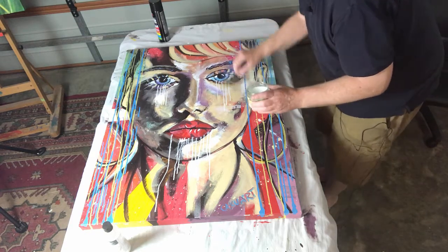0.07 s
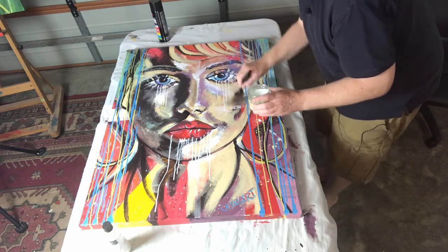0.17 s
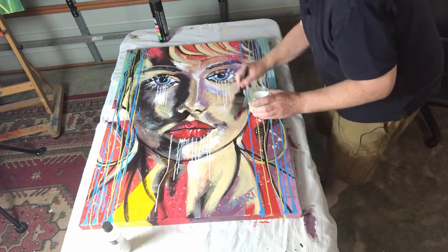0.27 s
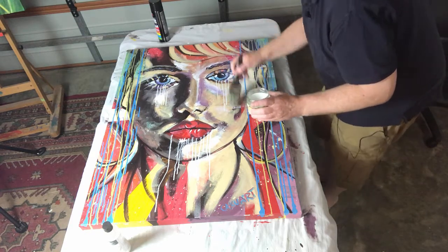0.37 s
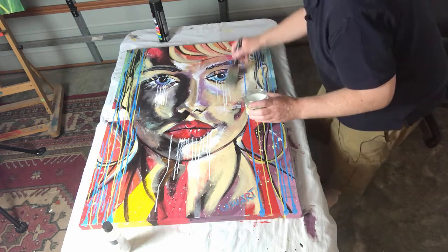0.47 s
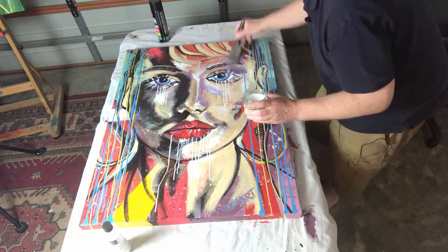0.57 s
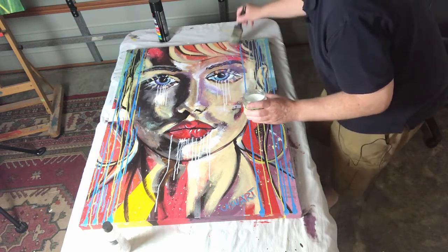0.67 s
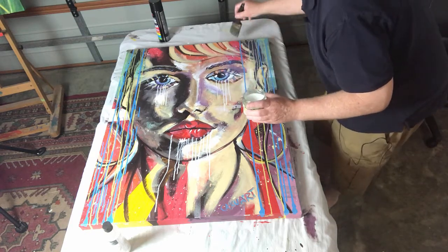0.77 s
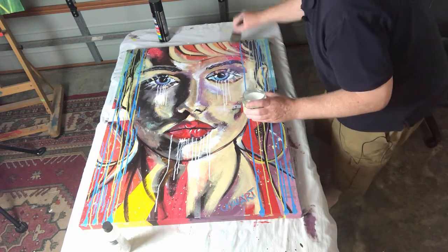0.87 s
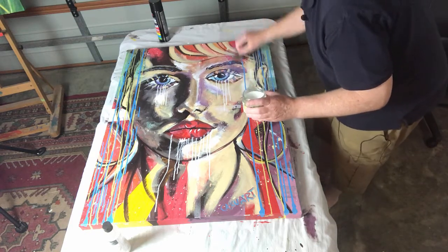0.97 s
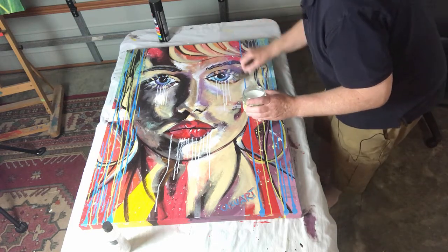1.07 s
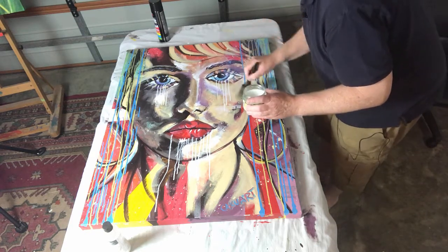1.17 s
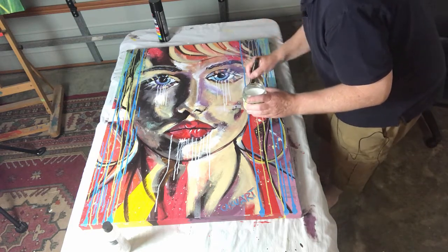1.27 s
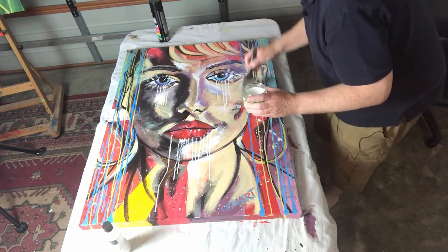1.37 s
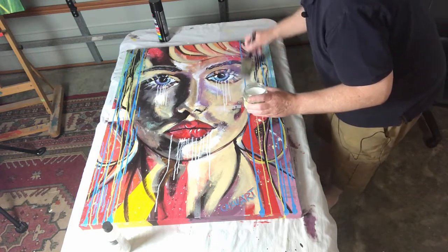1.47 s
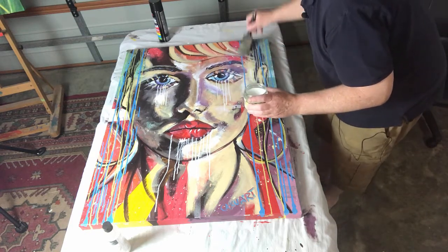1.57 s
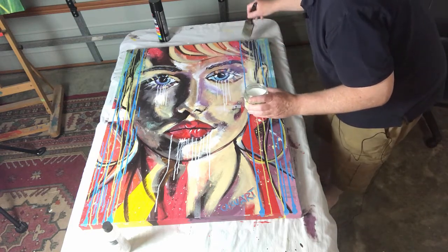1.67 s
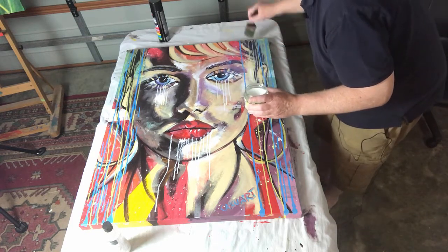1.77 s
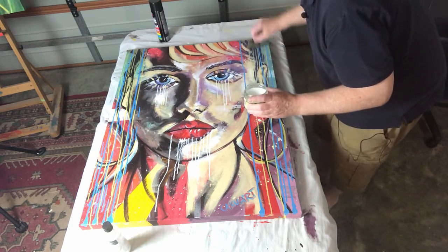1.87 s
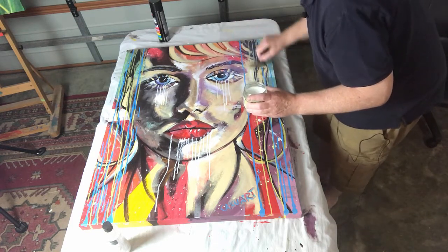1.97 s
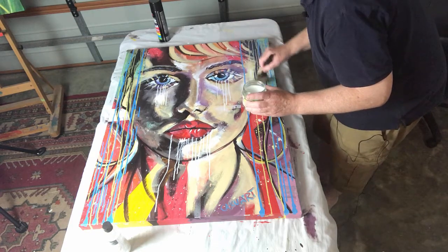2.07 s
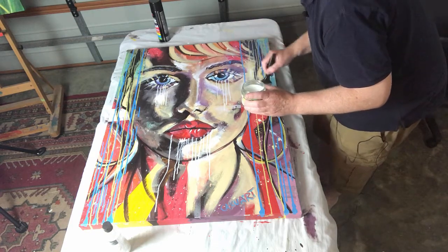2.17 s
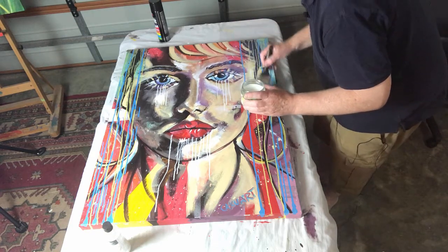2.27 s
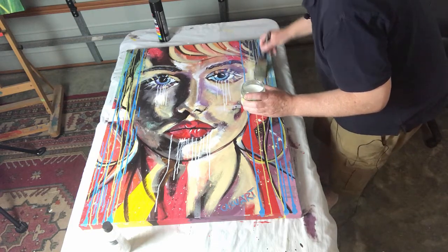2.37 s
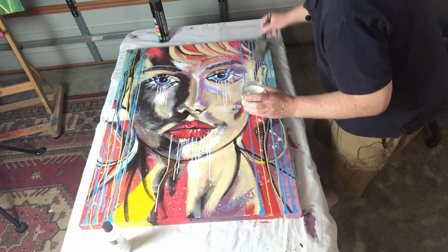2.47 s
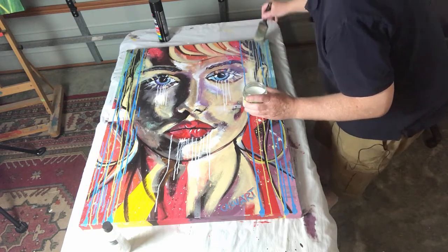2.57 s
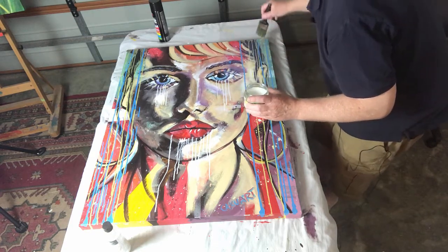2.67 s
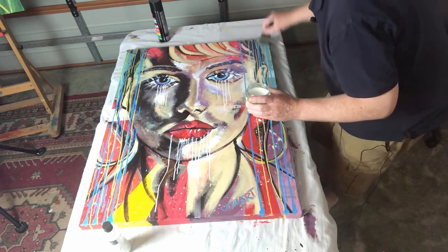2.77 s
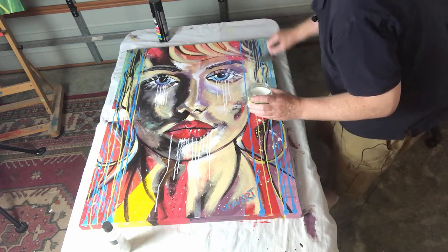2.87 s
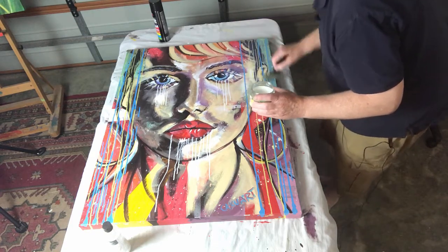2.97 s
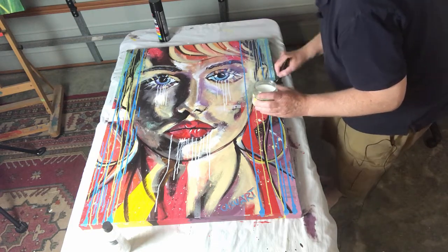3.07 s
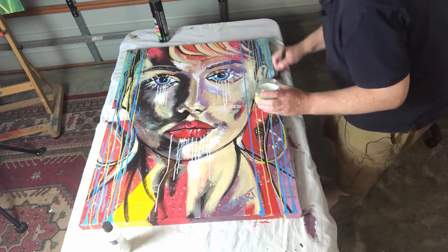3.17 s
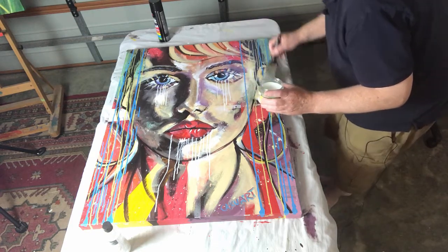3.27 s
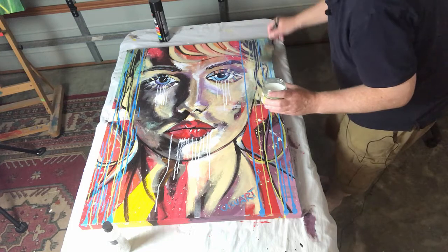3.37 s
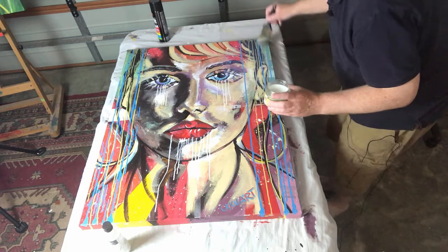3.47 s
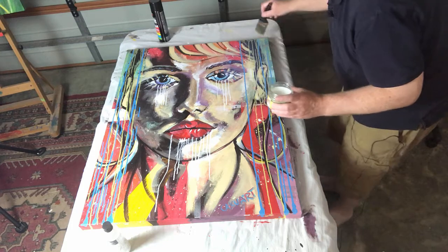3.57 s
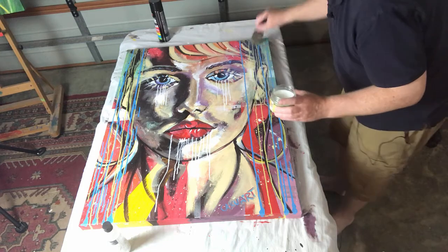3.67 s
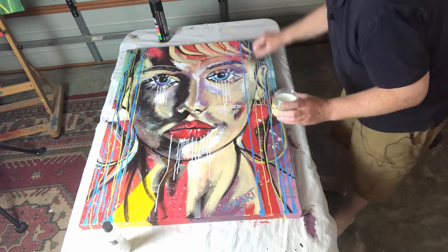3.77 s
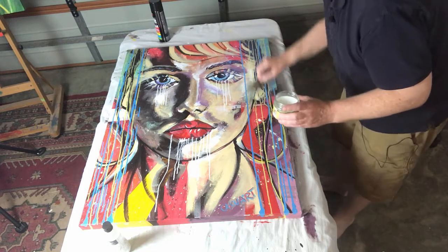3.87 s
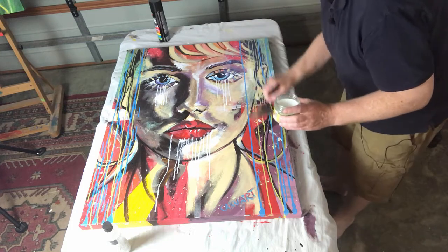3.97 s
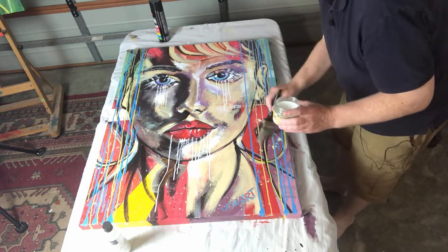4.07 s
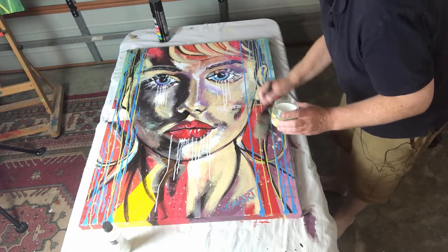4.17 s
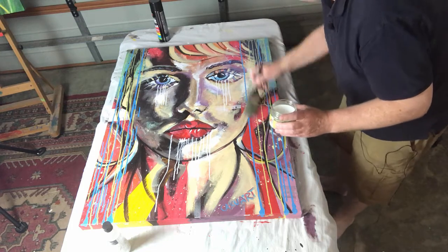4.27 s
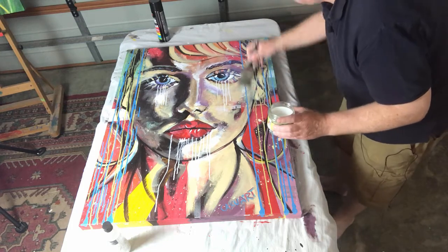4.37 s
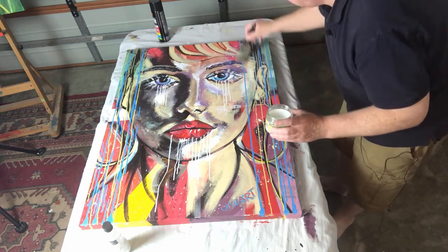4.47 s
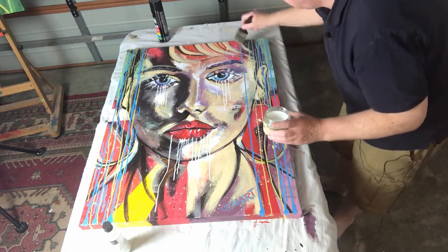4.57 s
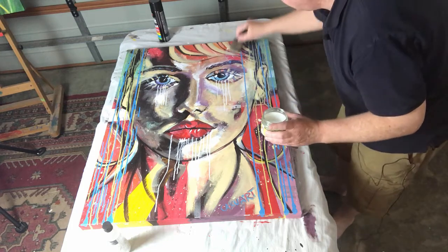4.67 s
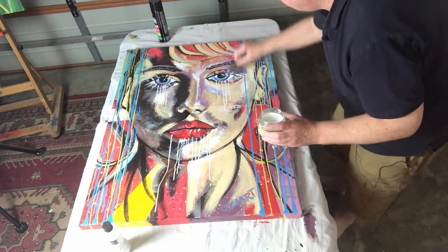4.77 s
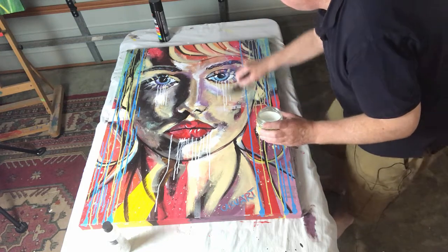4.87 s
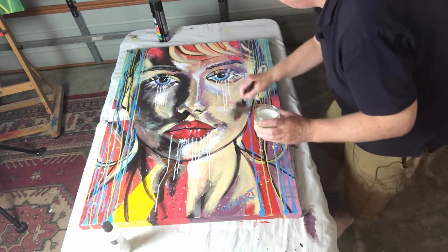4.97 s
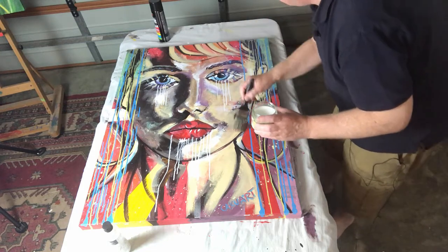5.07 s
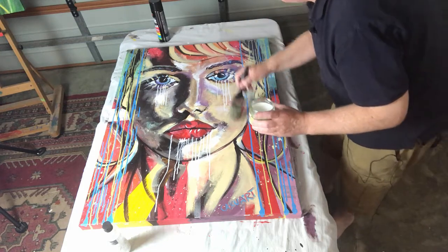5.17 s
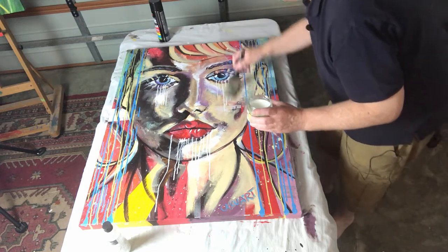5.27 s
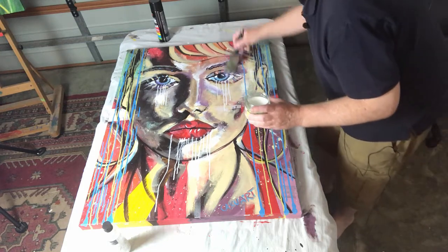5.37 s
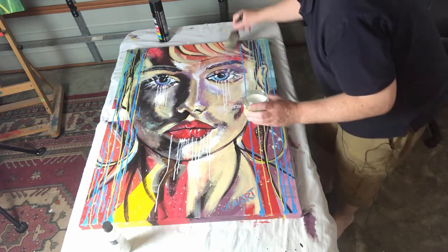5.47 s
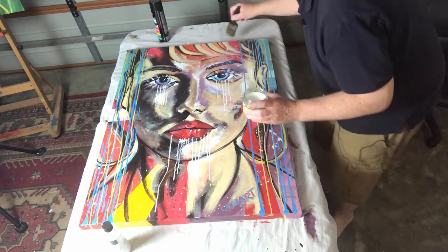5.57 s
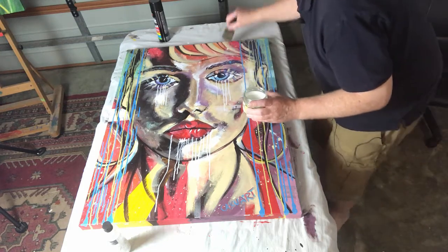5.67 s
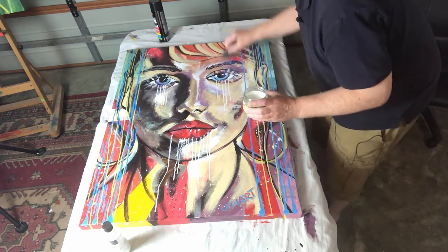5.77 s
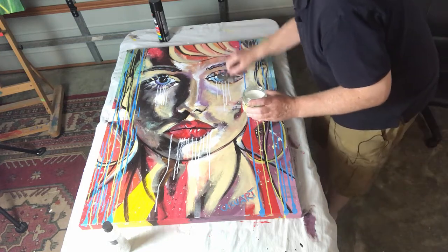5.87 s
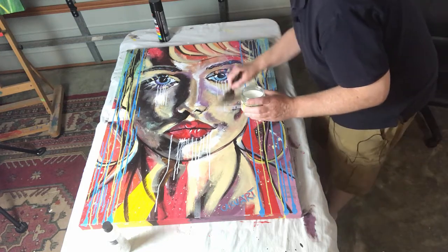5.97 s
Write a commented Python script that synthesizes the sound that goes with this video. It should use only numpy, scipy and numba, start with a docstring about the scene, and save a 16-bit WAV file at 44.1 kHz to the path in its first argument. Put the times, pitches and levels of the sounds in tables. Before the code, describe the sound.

A flat brush sweeps up and down a stretched canvas, about two strokes a second. Each stroke is a bristly hiss over a soft, hollow rub, with a light rasp that follows the speed of the hand. Now and then the bristles give a brief zip or bump the cloth, and two small ticks come midway. The room is a quiet garage with a short echo and faint hiss, heard in mono.

```python
"""A flat brush sweeps varnish up and down a stretched canvas: thirteen strokes, pulled and pushed by turns.
Its bristles flick over the threads and hiss, the cloth sounds like a soft drumhead, and a rasp
glides with the hand's speed. Now and then the brush zips, bumps or ticks.
Behind it is a quiet garage with a short echo, slow air and a faint hiss, all in mono."""
import sys
import numpy as np
from scipy import signal
from scipy.fft import rfft, irfft
from scipy.io import wavfile
from scipy.ndimage import uniform_filter1d, map_coordinates
from numba import njit

SR = 44100
rng = np.random.default_rng(int(sys.argv[2]) if len(sys.argv) > 2 else 0)


def dump(signal):
    """Clip the signal to [-1, 1] and save it as 16-bit WAV at the path in sys.argv[1]."""
    limited = np.clip(np.atleast_2d(signal).T, -1, 1)
    pcm = np.round(limited * 32767).astype(np.int16)
    wavfile.write(sys.argv[1], SR, pcm)


N = 264688
TIME = np.arange(N) / SR
COAST_S = (0.0976, .05)  # the hand runs on after easing off: pulled, pushed

# How the rub, scrape and hiss rise and fade in a stroke; first row pulled, second row pushed:
# lag/s, rise/s, growth along the stroke/dB, fade/(dB per s)
RUB_SHAPE = [(.004, 0.036, -1.3, 154), (.003, 0.032, 3.2, 197)]
SCRAPE_SHAPE = [(.004, .06, 12.5, 141), (.005, 0.038, -4.5, 124)]
HISS_SHAPE = [(0.0054, 0.061, 1.7, 206), (0.0064, 0.043, -0.75, 170)]
# The strokes, a pulled one first: start/s, easing off/s, rub/dB, scrape/dB, hiss/dB,
# threads crossed at top speed/Hz, brightness/dB, first comb spacing/Hz, last comb spacing/Hz
STROKES = [ (-.2, 0.159, -47.5, -54.5, -47.5, 2000, 1.5, 7500, 5330),
           (0.268, 0.603, -45.5, -54, -46, 1920, 3, 5140, 9400),
           (0.756, 1.107, -44.5, -52.5, -42.5, 1970, -1, 9300, 5840),
           (1.245, 1.546, -47, -51.5, -44, 1990, 1.5, 6700, 10100),
           (1.715, 2.04, -48, -51.5, -41.5, 1690, -1, 9150, 9100),
           (2.17, 2.496, -48, -54, -45.5, 1730, -2, 8900, 10900),
           (2.623, 3.008, -47, -53, -41, 1550, 1.5, 8700, 8700),
           (3.126, 3.415, -47, -51, -41.5, 1690, 2.5, 8500, 9500),
           (3.567, 3.974, -48.5, -51, -46.5, 2030, -1, 8500, 5530),
           (4.071, 4.418, -45.5, -49, -42, 1990, 4.5, 5030, 8200),
           (4.586, 4.909, -46.5, -52.6, -43, 1830, 2, 6900, 4840),
           (5.092, 5.42, -44.5, -52, -43, 1990, 4, 4800, 9400),
           (5.595, 5.939, -44.5, -52.5, -44.3, 1980, 2, 8200, 5400)]
def brush(rub_press_share=0.68, scrape_press_share=0.78, skate_db=-3):
    """Each stroke rubs, scrapes, rasps and hisses; a pulled tuft skates, a pushed one digs in."""
    rub_db, scrape_db, hiss_db = np.transpose(STROKES)[2:5]
    pulled = np.arange(len(STROKES)) % 2 == 0
    body = canvas(stroke_level(rub_db, RUB_SHAPE, rub_press_share),
                  stroke_level(scrape_db, SCRAPE_SHAPE, scrape_press_share))
    rasp = weave(stroke_level(rub_db + skate_db * pulled, RUB_SHAPE, rub_press_share))
    hiss = bristles(stroke_level(hiss_db, HISS_SHAPE))
    return body + rasp + hiss


# The tone of the rubbed cloth and of the bent bristles: f/Hz, level/dB
RUB_TONE = [(100, -21), (200, -10), (305, -7), (370, -3.5), (450, 0), (600, 3), (800, -1), (1050, -3.5),
            (1500, -13), (2400, -29), (3400, -45)]
SCRAPE_TONE = [(600, -16), (980, 2), (1300, 0.5), (1750, -2), (2150, 0), (2650, -8), (3300, -16.5),
               (4500, -12.5)]
def canvas(rub_db, scrape_db, frame_hz=240, swing_hz=170, patchy_db=0.78):
    """The dragged tuft shakes the cloth; bent bristles add a scrape."""
    speed, _, _ = hand()
    # ripples come back from the frame, sooner or later as the brush travels
    spacing_hz = frame_hz + swing_hz * speed + 15 * walk(rate=6)
    ripples = reflect(flicks(per_s=6000, spread_db=0.4), spacing_hz, strength=0.33)
    rub = colour(cloth(ripples), RUB_TONE)
    bent = colour(flicks(per_s=9000, spread_db=0.4), SCRAPE_TONE)
    scrape = clumps(bent, depth_db=2.5, size=1024)
    return undb(patchy_db * walk(rate=45)) * (undb(rub_db) * rub + undb(scrape_db) * scrape)


# The tone of the flicking hairs: f/Hz, level/dB
HISS_TONE = [(1500, -23), (2600, 0.5), (3400, -5.5), (4100, -5), (5200, -1), (6700, 1), (8300, 0.5),
             (9800, 0.5), (11300, -2), (13500, 0), (15500, -5.5)]
def bristles(level_db, rest_tilt_db=-3, speed_tilt_db=5.5, patchy_db=0.79):
    """Hairs hiss, brighter at speed; the echo off the canvas and the hollow under the tuft add a swish."""
    speed, _, bright_db = hand()
    spacing_hz = comb_spacing() * (1 + .025 * walk(rate=20))
    hairs = clumps(colour(flicks(per_s=24000, spread_db=1.2), HISS_TONE), depth_db=1.94)
    hollow = resonate(hairs, spacing_hz, width=1600)
    hiss = unit(reflect(hairs, spacing_hz, strength=0.29) + 0.38 * hollow)
    dull = signal.sosfiltfilt(signal.butter(2, 9000, fs=SR, output="sos"), hiss)
    tilt = undb((rest_tilt_db + speed_tilt_db * speed + bright_db) / 2)
    return undb(level_db + patchy_db * walk(rate=80)) * (dull / tilt + (hiss - dull) * tilt)


def weave(level_db, turn_hz=800, trim_db=-14.5, slow_gain_db=7, octave_db=-1.5, patchy_db=3):
    """Bristles crossing the threads rasp at a pitch that follows the hand, and softer an octave below."""
    speed, top_hz, _ = hand()
    thread_hz = (turn_hz + (top_hz - turn_hz) * speed) * (1 + 0.021 * walk(rate=14))
    blur_hz = 70 + 120 * speed ** 6  # at full speed the bristles fall out of step

    def rasp(hz):
        band = resonate(rng.standard_normal(N), hz, blur_hz) / np.sqrt(blur_hz)
        return unit(resonate(band, hz, width=470))

    moving = np.minimum(speed / 0.35, 1)
    both = rasp(thread_hz) + undb(octave_db) * rasp(thread_hz / 2)
    return moving * both * undb(level_db + trim_db + slow_gain_db * (1 - speed) + patchy_db * walk(rate=14))


def hand(bright_drift_db=-6):
    """The hand speeds up and slows down in each stroke: gives speed 0-1, top thread rate, brightness."""
    speed, top_hz, bright_db = np.zeros((3, N))
    for k, (start, ease, _, _, _, hz, db, *_) in enumerate(STROKES):
        along = (TIME - start) / (ease + COAST_S[k % 2] - start)
        begun = along >= 0
        along = np.minimum(along[begun], 1)
        speed[begun] = np.sin(np.pi * along)
        top_hz[begun] = hz
        bright_db[begun] = db + bright_drift_db * (along - .5)  # the hiss dulls along a stroke
    return speed, top_hz, uniform_filter1d(bright_db, size=2000)


# The hand leans on the brush or lets up: t/s, swell of the hiss/dB, half length/s
PRESSES = [(0.067, 9.5, 0.11), (.31, 6, 0.013), (0.57, 2.3, 0.046), (1.03, 1, .1), (1.118, 2.5, 0.027),
           (1.31, 1.3, 0.033), (1.904, 2, 0.054), (1.935, -7, 0.0093), (2.062, 5.5, 0.024),
           (2.265, 3, 0.034), (2.35, -0.5, .03), (2.877, 5, .12), (3.2, 3, 0.023), (3.832, 13.5, 0.14),
           (4.22, 12.5, 0.059), (4.726, 4.5, 0.038), (4.855, 6.5, 0.11), (5.154, 4, .03), (5.293, 4, 0.033),
           (5.79, 9.5, 0.12), (5.903, 3, 0.027)]
def stroke_level(levels_db, shape, press_share=1):
    """One sound's level in dB: the tuft bites, drags and eases off, and swells under the hand's weight."""
    power = np.full(N, 1e-12)
    for k, ((start, ease, *_), db) in enumerate(zip(STROKES, levels_db)):
        lag_s, rise_s, growth_db, fade_db_per_s = shape[k % 2]
        heard = (TIME >= start) & (TIME < ease + .5)
        t = TIME[heard]
        along = np.minimum((t - start) / (ease - start), 1)
        bite = np.clip((t - start - lag_s) / rise_s, 0, 1)
        faded_db = fade_db_per_s * np.maximum(t - ease, 0)
        power[heard] += (bite * undb(db + growth_db * (along - .5) - faded_db)) ** 2
    swell_db = sum(db * np.exp(-((TIME - s) / length) ** 2) for s, db, length in PRESSES)
    return 10 * np.log10(power) + press_share * swell_db


def comb_spacing(bend_s=0.31):
    """Hiss plus echo makes a comb of peaks: it sinks as a pulled tuft rises, climbs as a pushed one bends."""
    spacing_hz = np.zeros(N)
    for k, (start, ease, *_, first_hz, last_hz) in enumerate(STROKES):
        age = TIME - start
        if k % 2:  # pushed
            moved = np.sin(np.pi / 2 * np.clip(age / bend_s, 0, 1)) ** 2
        else:
            moved = np.minimum(age, ease - start + COAST_S[0]) / (ease - start)
        spacing_hz = np.where(age >= 0, first_hz + (last_hz - first_hz) * moved, spacing_hz)
    return uniform_filter1d(spacing_hz, size=800)


def flicks(per_s, spread_db):
    """Bristles snap free of the threads: a crowd of big and small clicks."""
    present = rng.random(N) < per_s / SR
    size = undb(spread_db * np.minimum(rng.exponential(size=N), 6))
    return unit(present * size * rng.standard_normal(N))


def clumps(x, depth_db, size=512):
    """Clumps of wet hair grip and let go, each briefly in its own range of pitch."""
    bands = signal.stft(x, nperseg=size)[2]
    grip = rng.standard_normal(bands.shape)
    for _ in range(2):
        grip = uniform_filter1d(uniform_filter1d(grip, size=5, axis=0), size=5, axis=1)
    return unit(signal.istft(bands * undb(depth_db * unit(grip)), nperseg=size)[1][:N])


# The notes the stretched cloth rings with: f/Hz, width/Hz, level/dB
CLOTH_NOTES = [(109, 39, 7.5), (356.3, 9, -3.5), (426, 9.2, -2.5), (468.5, 94, -1.5), (560, 26, -3),
               (703, 51, -4), (815, 17, 3.5), (939, 31, 0.5), (1610, 55, 1.5)]
def cloth(x, ring_db=1):
    """The canvas passes a push on and rings like a soft drumhead."""
    return x + undb(ring_db) * sum(undb(db) * resonate(x, hz, width) for hz, width, db in CLOTH_NOTES)


# The bristles lock onto the weave: start/s, end/s, first f/Hz, last f/Hz, level/dB
ZIPS = [(0.519, 0.597, 1590, 1250, -46), (1.057, 1.157, 1750, 1600, -42), (1.256, 1.345, 950, 1480, -46),
        (1.46, 1.563, 1850, 1250, -56), (1.738, 1.922, 480, 756, -46), (2.02, 2.08, 1720, 1630, -50),
        (2.326, 2.46, 1720, 1550, -52), (3.126, 3.206, 946, 1300, -48), (3.81, 3.97, 1970, 1620, -44),
        (4.863, 4.954, 1840, 1720, -42), (5.111, 5.168, 990, 1590, -52), (5.786, 5.968, 2000, 1640, -46)]
def zips():
    """Many bristles skip over the threads in step: a brief, rough glide."""
    out = np.zeros(N)
    for start, end, first_hz, last_hz, db in ZIPS:
        along = np.clip((TIME - start) / (end - start), 0, 1)
        hz = first_hz + (last_hz - first_hz) * along
        band = resonate(rng.standard_normal(N), hz, width=110)
        out += undb(db) * np.sin(np.pi * along) * unit(resonate(band, hz, width=400))
    return out


# Soft bumps: t/s, peak level/dB, f/Hz, width/Hz
BUMPS = [(.44, -34.5, 357, 40), (.777, -44, 600, 300), (.985, -32, 462, 50), (1.069, -33.5, 150, 55),
         (1.302, -41, 134, 40), (3.072, -39, 280, 200), (3.482, -34.5, 438, 350), (3.587, -32, 377, 160),
         (4.603, -34, 487, 110), (5.085, -47, 540, 50), (5.611, -40, 560, 121), (5.765, -29.5, 452, 45),
         (5.994, -24.5, 159, 160)]
def bumps():
    """The brush bumps the canvas and the cloth thuds."""
    out = np.zeros(N)
    for s, db, hz, width in BUMPS:
        push = 1. * (np.arange(N) == int(s * SR))
        thud = cloth(resonate(resonate(push, hz, width), hz, 2 * hz))
        out += undb(db) * thud / np.abs(thud).max()
    return out


# Hard little ticks: t/s, ring level/dB, f/Hz, width/Hz, rattle time/s, crack against the ring/dB
TICKS = [(3.373, -25, 5170, 1010, 0.0025, -36), (3.4815, -28.5, 1420, 710, 0.00012, 4)]
def ticks():
    """A hard touch of the brush rattles for an instant, rings and cracks."""
    out = np.zeros(N)
    for s, db, hz, width, rattle_s, crack_db in TICKS:
        age = TIME - s
        contact = (age >= 0) * np.exp(-np.abs(age) / rattle_s) * rng.random(N) ** 4
        ring = cloth(resonate(resonate(contact, hz, width), hz, 2 * width))
        crack = resonate(resonate(contact, hz=2900, width=7000), hz=2700, width=9000)
        out += undb(db) * (ring / np.abs(ring).max() + undb(crack_db) * crack / np.abs(crack).max())
    return out


def garage(x, fade_s=0.37, echo_db=-14):
    """Floor and walls add a short, weak echo."""
    age = TIME[:SR // 2]
    tail = rng.standard_normal(len(age)) * undb(-60 * age / fade_s) * (age > .005)
    return x + undb(echo_db) * signal.fftconvolve(x, tail / np.linalg.norm(tail))[:N]


# The tone of the quiet room: f/Hz, level/dB
ROOM_TONE = [(12, 6), (22, -1.5), (35, -54), (50, -7.5), (80, -24.5), (125, -21), (220, -22.5),
             (420, -24.5), (650, -23), (1100, -33), (3000, -38.5), (9000, -40), (15000, -47)]
def room_tone(level_db=-48.5, sway_db=0.8):
    """Slow air rumbles under a faint, even hiss."""
    return undb(level_db + sway_db * walk(rate=8.1)) * colour(rng.standard_normal(N), ROOM_TONE)


def air(level_db=-42):
    """Moving air pushes on the microphone, mostly too low to hear."""
    tone = [(4, -17.5), (12, -1.0), (22, -19.5), (40, -24.5), (70, -32.5)]  # f/Hz, level/dB
    return undb(level_db) * colour(rng.standard_normal(N), tone)


def undb(db):
    """Turn decibels into a number to multiply by."""
    return 10 ** (np.asarray(db) / 20)


def unit(x):
    """Scale to an average strength (rms) of 1."""
    return x / np.sqrt(np.mean(x ** 2))


def colour(x, points):
    """Shape the tone by a curve of (f/Hz, level/dB) points that falls away past its ends; strength 1."""
    hz, db = np.transpose(points)
    f = np.maximum(np.arange(N // 2 + 1) * SR / N, 1)
    ends = np.minimum(f / hz[0], 1) * np.minimum(hz[-1] / f, 1)
    gain = undb(np.interp(np.log(f), np.log(hz), db)) * ends ** 2
    return unit(irfft(rfft(x) * gain, N))


@njit
def moving_band(x, hz, width):
    """A filter that lets one band of pitches through; its centre and width may move."""
    out, band, low = np.empty(len(x)), 0., 0.
    for i in range(len(x)):
        step, damping = np.tan(np.pi * hz[i] / SR), width[i] / hz[i]
        now = (band + step * (x[i] - low)) / (1 + step * (step + damping))
        band, low = 2 * now - band, low + 2 * step * now
        out[i] = damping * now
    return out


def resonate(x, hz, width):
    """Ring around one pitch; a smaller width (in Hz) rings longer."""
    centre_hz = np.clip(hz, 10, SR / 2 - 2000) * np.ones(N)
    return moving_band(x + 1e-18, centre_hz, width * np.ones(N))


def reflect(x, spacing_hz, strength):
    """Add one moving echo: a comb of gliding peaks and dips."""
    late = map_coordinates(x, [np.arange(N) - SR / spacing_hz], order=3)
    return (x + strength * late) / np.sqrt(1 + strength ** 2)


def walk(rate):
    """A smooth random drift of strength 1, with `rate` new values a second."""
    hold = max(int(SR / rate), 2)
    held = np.repeat(rng.standard_normal(N // hold + 1), hold)[:N]
    return unit(uniform_filter1d(uniform_filter1d(held, hold), hold))


def scene():
    """The brush on the canvas in its room, the same in both channels."""
    mono = garage(brush() + zips() + bumps() + ticks()) + room_tone() + air()
    return np.array([mono, mono])


def record(dry, top_hz=15700):
    """Cut off the highest treble."""
    return signal.sosfilt(signal.ellip(12, .2, 80, top_hz, fs=SR, output="sos"), dry)


dry = scene()
out = record(dry)
dump(out)
```